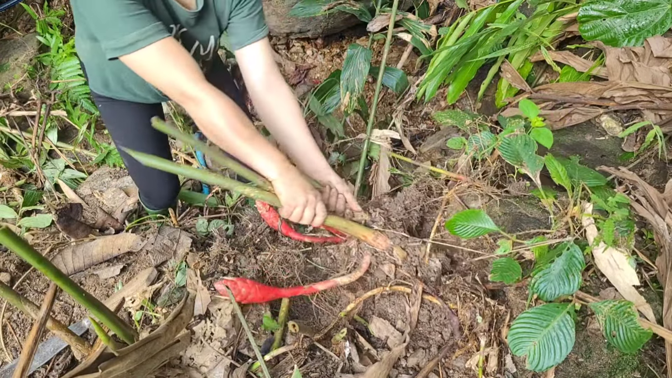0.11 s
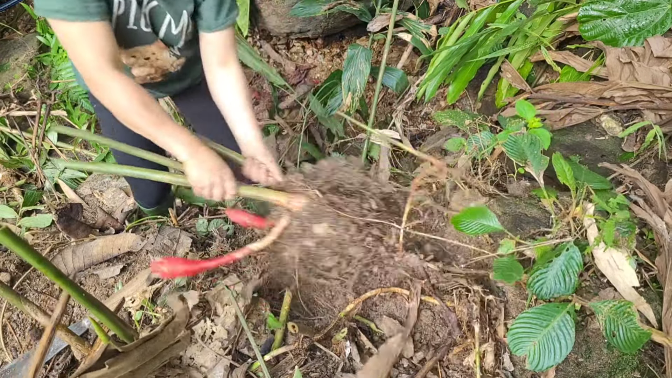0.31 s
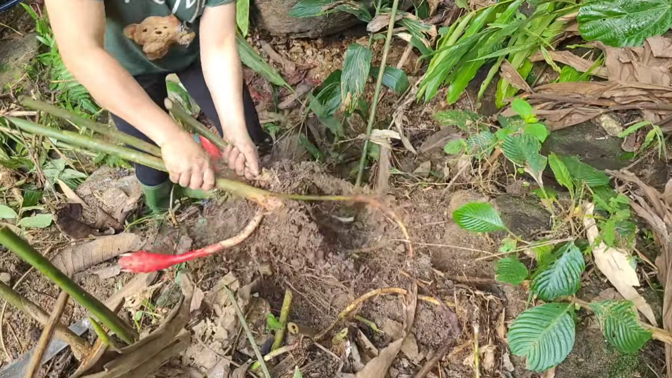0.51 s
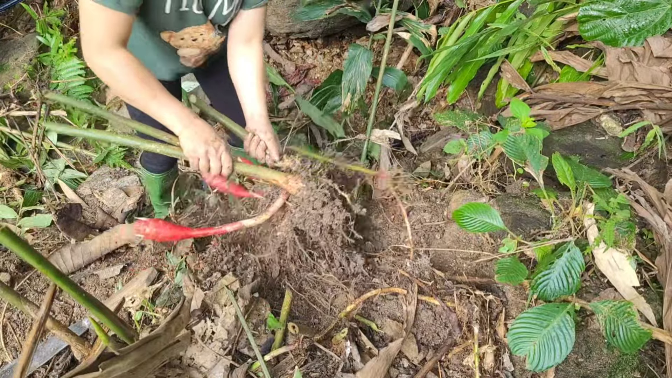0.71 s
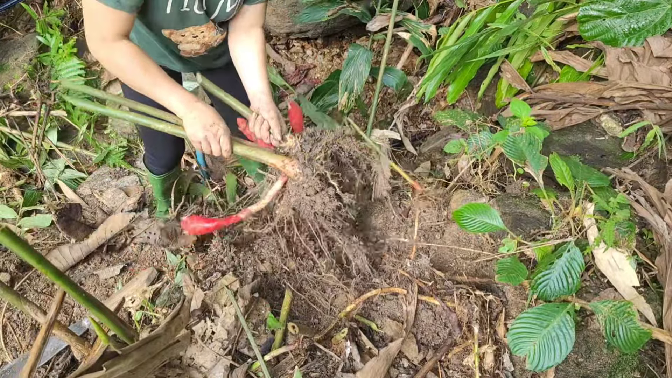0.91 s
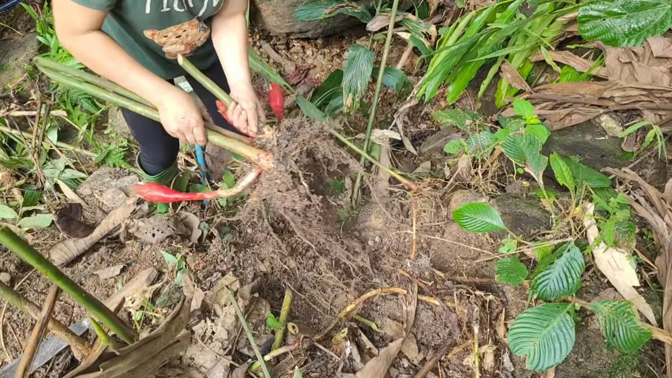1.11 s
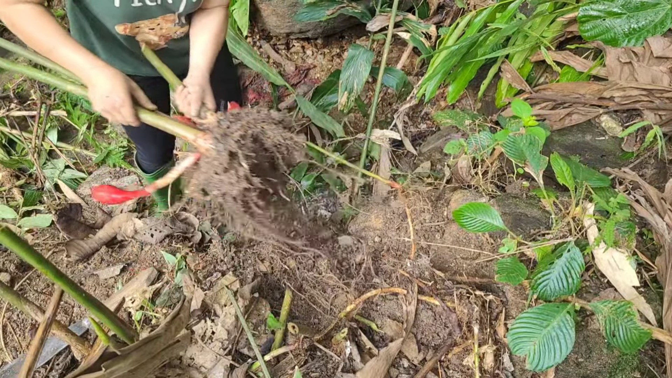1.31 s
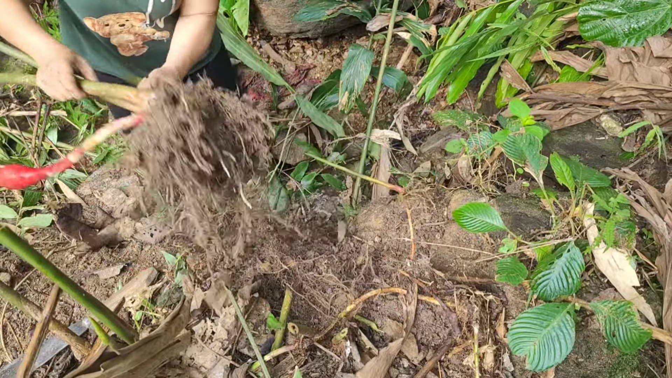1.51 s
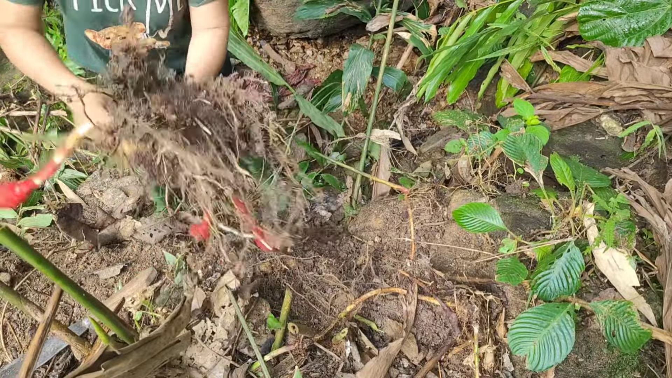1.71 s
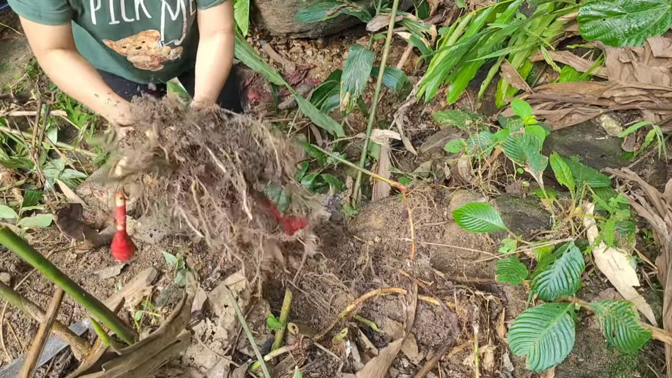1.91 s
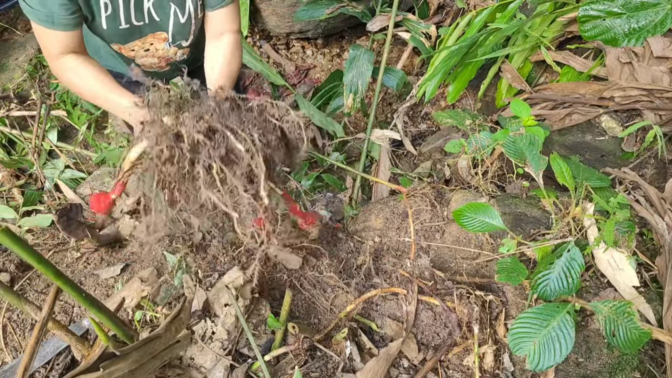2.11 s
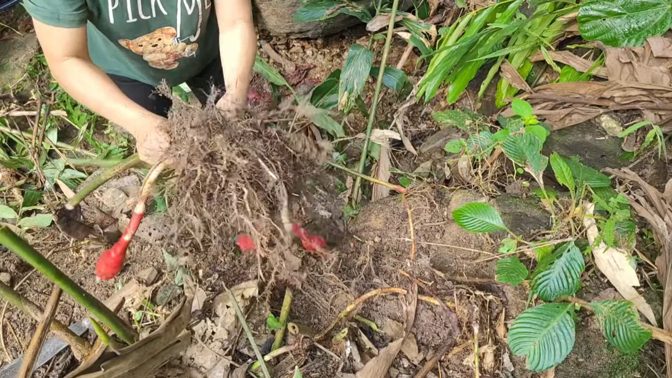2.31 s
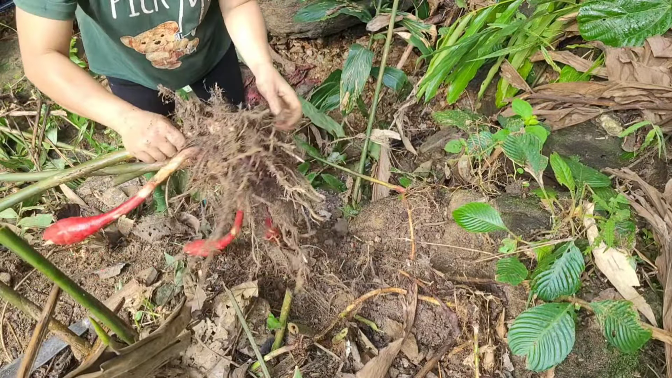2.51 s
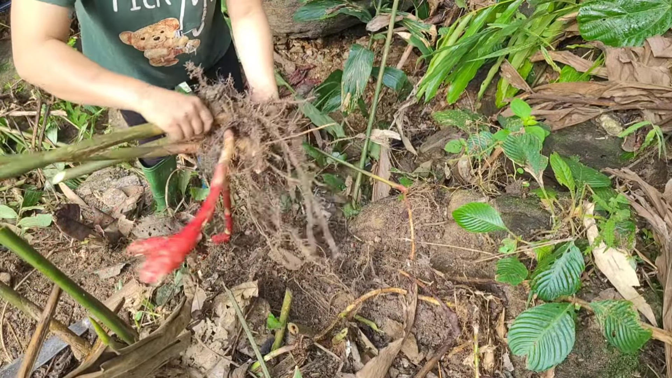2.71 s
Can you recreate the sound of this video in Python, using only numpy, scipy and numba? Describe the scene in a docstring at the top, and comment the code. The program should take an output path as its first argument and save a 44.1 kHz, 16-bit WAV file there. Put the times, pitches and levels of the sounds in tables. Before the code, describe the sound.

A plant clump is torn from forest soil: a tight burst of loud root snaps, then crackling rootlets and pouring grit, fading to light rustles and small clod knocks, heard close outdoors over faint hiss.

```python
"""Uprooting a clump on a forest slope

A clump of plants is pulled out of the ground, a metre or two from a phone. Thick roots snap as damped
modes of wood and fibre; the root ball crunches through dry litter in volleys of tiny rings. Soil, summed
from thousands of small rings, trickles and patters on dead leaves while the clump is lifted and turned.
A hollow tone sinks, clods knock, filtered noise rumbles in the ground and the forest hisses faintly."""
import sys
import numpy as np
from scipy import signal
from scipy.fft import rfft, irfft
from scipy.io import wavfile
from scipy.ndimage import uniform_filter1d
from numba import njit

SR = 44100
rng = np.random.default_rng(int(sys.argv[2]) if len(sys.argv) > 2 else 0)


def dump_mix(stems):
    """Bounce the given channels to the path in sys.argv[1] as a 16-bit WAV at rate SR."""
    frames = np.atleast_2d(stems).T  # one column per channel
    limited = np.clip(frames, -1, 1)  # hard clip at full scale
    pcm = np.round(limited * 32767).astype(np.int16)
    wavfile.write(sys.argv[1], SR, pcm)


N = 127890  # samples, 2.9 s

# stereo arrival: left ahead of right (mean and spread), and spread of the level between the two
LEAD_S, LEAD_SPREAD_S, PAN_SPREAD_DB = .0001, .00011, 3.5
# tiny cracks of splinters, rootlets and leaves
CRACKS_PER_S, CRACK_Q = 4500, 4.05


def undb(db):
    """Decibels to gain."""
    return 10 ** (np.asarray(db) / 20)


def unit(x):
    """Scale to rms 1."""
    return x / np.sqrt(np.mean(x ** 2) + 1e-20)


def curve(table, axis=1):
    """One column of a time table, joined by straight lines."""
    rows = np.array(table)
    return np.interp(np.arange(N) / SR, rows[:, 0], rows[:, axis])


def colour(x, points):
    """Minimum-phase filter whose gain in dB runs straight between the points on a log frequency scale."""
    size = 4096
    hz, db = np.array(points).T
    bins_hz = np.arange(size // 2 + 1) * SR / size
    gain = undb(np.interp(np.log(bins_hz + 1), np.log(hz), db))
    # folding the cepstrum onto positive times makes the filter causal
    cepstrum = irfft(np.log(gain))
    cepstrum[1:size // 2] *= 2
    cepstrum[size // 2 + 1:] = 0
    impulse = irfft(np.exp(rfft(cepstrum)))
    return signal.fftconvolve(x, impulse[None], axes=1)[:, :N]


@njit
def ring(start, hz, t60, size):
    """Sum of damped sines, each started between samples and stopped 60 dB down."""
    out = np.zeros(N)
    for k in range(len(start)):
        first = int(np.ceil(start[k] * SR))
        rate = (2j * np.pi * hz[k] - np.log(1000.) / t60[k]) / SR
        state = size[k] * np.exp(rate * (first - start[k] * SR))
        step = np.exp(rate)
        for i in range(max(first, 0), min(N, first + int(t60[k] * SR) + 2)):
            out[i] += state.imag
            state *= step
    return out


def grains(start, hz, t60, size, lead=0., pan_db=0.):
    """Small rings as they reach the left and right microphone, apart in time and level."""
    hz = np.clip(hz, 20, .45 * SR)
    ears = []
    for side in (1, -1):
        arrival = start - side * lead / 2
        ears.append(ring(arrival, hz, np.abs(t60), size * undb(side * pan_db / 2)))
    return np.array(ears)


def particles(start, hz, q, size, spread_db):
    """Contacts of uneven strength and either sign, scattered over the ground; Q sets how long they ring."""
    count = len(start)
    strength = undb(spread_db * np.minimum(rng.exponential(size=count), 5))
    strength = strength * rng.choice([-1, 1], count)
    lead, pan = rng.standard_normal((count, 2)).T
    t60 = np.log(1000) / np.pi * q / hz
    return grains(start, hz, t60, size * strength, LEAD_S + LEAD_SPREAD_S * lead, PAN_SPREAD_DB * pan)


def shower(per_s, q, spread_db, low_hz, high_hz):
    """A steady fall of particles with an even spectrum; high ones outnumber low ones in each octave."""
    when, pick = rng.random((int(per_s * N / SR), 2)).T
    low, high = np.sqrt(low_hz), np.sqrt(high_hz)
    hz = (low + pick * (high - low)) ** 2
    return particles(when * N / SR, hz, q, hz ** .75, spread_db)


def volley(start, length, db, hz, octaves, per_s, q):
    """A cluster of contacts that sets in fast and thins out; the level is its rms over the length."""
    count = int(per_s * length) + 2
    pitch = hz * 2 ** (octaves * rng.standard_normal(count))
    when = start + length * rng.triangular(0, .2, 1.3, count)
    x = particles(when, pitch, q, np.sqrt(pitch), 2.5)
    return unit(x) * np.sqrt(length * SR / N) * undb(db)


def forest_air():
    """Faint forest hiss: independent noise at the two microphones, filtered to one colour."""
    # spectrum of the air: f/Hz, level/dB
    air_colour = [(30, -19.5), (120, -8), (350, -3.5), (700, -9.5), (2200, 2.5), (5000, 4.5), (6600, 3),
                  (7500, 9.5), (8600, 2), (15000, -12)]
    return unit(colour(rng.standard_normal((2, N)), air_colour)) * undb(-54)


def heave():
    """The ground shudders as the roots let go: low band-passed noise, mostly equal at both microphones."""
    # strength of the shudder: t/s, level/dB
    shudder = [(0, -81), (.2, -88.5), (.26, -53.5), (.29, -55.5), (.33, -57), (.39, -74.5), (.85, -72.5),
               (1.5, -87), (2.3, -80), (2.9, -87)]
    centre_hz, side_db = 58, -8
    band = signal.butter(2, centre_hz * np.array([.75, 1.4]), "band", fs=SR, output="sos")
    mid, side = signal.sosfilt(band, rng.standard_normal((2, N)))
    rumble = unit(mid) + undb(side_db) * unit(side) * np.array([[1], [-1]])
    return rumble * undb(curve(shudder))


def soil():
    """Grit and crumbs pour from the roots onto dry leaves as showers of tiny rings in an uneven stream."""
    # flow of loose soil: t/s, fine grit level/dB, coarser crumbs level/dB
    flow = [(0, -66.5, -69.5), (.12, -57, -59.5), (.24, -51.5, -59.5), (.27, -36, -42), (.3, -47.5, -52.5),
            (.345, -44, -48.5), (.39, -50.5, -56), (.47, -50.5, -56), (.52, -46, -44.5), (.575, -46, -53),
            (.61, -38.5, -44.5), (.69, -39, -42.5), (.75, -42, -46.5), (.8, -33, -38), (.88, -39.5, -42),
            (.93, -38, -44), (.97, -38, -44), (1.06, -44.5, -47.5), (1.35, -46.5, -51.5),
            (1.58, -48, -56.5), (1.7, -47, -53.5), (1.96, -52.5, -54.5), (2.07, -47, -55.5),
            (2.1, -41, -50), (2.19, -46.5, -53.5), (2.3, -43.5, -49), (2.55, -47, -51), (2.68, -48, -55.5),
            (2.75, -47.5, -51.5), (2.9, -49, -57)]
    # grit landing on dry leaves: f/Hz, level/dB
    grit_colour = [(600, -15), (1500, -4), (2600, -1), (3600, -1), (5200, -0.5), (6400, -2.5), (7500, -0.5),
                   (9000, -5), (12000, -1.5), (16000, -4.5)]
    # crumbs landing on dry leaves: f/Hz, level/dB
    crumb_colour = [(30, -31.5), (70, -14), (150, -13), (245, -3.5), (400, -2), (490, -3), (620, 2),
                    (820, 3.5), (950, -1), (1400, 2.5), (2000, 0.5), (3000, -4.5), (6000, -25)]
    flicker_db, flicker_per_s = .7, 50  # spread of the random steps before smoothing, and their rate
    hold = int(SR / flicker_per_s)
    steps = np.repeat(rng.standard_normal(N)[:N // hold + 1], hold)
    flicker = undb(flicker_db * uniform_filter1d(steps, hold)[:N])
    grit = shower(per_s=6000, q=4, spread_db=1.5, low_hz=1230, high_hz=18170)
    grit = unit(colour(grit, grit_colour))
    crumbs = shower(per_s=2200, q=5.16, spread_db=2.9, low_hz=82, high_hz=4050)
    crumbs = unit(colour(crumbs, crumb_colour))
    return flicker * (grit * undb(curve(flow, axis=1)) + crumbs * undb(curve(flow, axis=2)))


def scuffs():
    """Boots and root ball rub softly against the earth: dull volleys of low contacts."""
    # scuffs: t/s, length/s, level/dB, centre f/Hz
    rubs = [(0.068, 0.0624, -61.5, 485), (.485, 0.0589, -52, 421), (1.1, 0.0871, -58.5, 313),
            (1.259, 0.0373, -55, 297), (2.093, 0.0407, -58, 272), (2.235, 0.0656, -56.5, 297),
            (2.55, 0.0793, -57, 281)]
    return sum(volley(*row, octaves=.389, per_s=760, q=4.31) for row in rubs)


def roots():
    """Each root breaks with a tick of fibres, a woody crack, a spray of splinters and a thump in the earth."""
    # snaps: t/s, thump f/Hz, thump level/dB, woody crack level/dB, fibre tick level/dB, fibre pitch [ratio]
    snaps = [(0.1359, 700, -48.5, -38.5, -29, 1), (.193, 500, -48, -33, -31, 1.09),
             (0.2212, 573, -20.5, -16, -26.5, 0.806), (0.2441, 597, -41, -35, -22.5, 1.42),
             (0.2515, 281, -20, -19.5, -21, 1.25), (.2555, 320, -41, -28, -22.5, 1.15),
             (.2588, 603, -20.5, -18, -29, 0.8), (0.2605, 327, -23.5, -20, -15.5, 1.024),
             (.2625, 525, -40.5, -19.5, -20.5, 0.995), (.2662, 436, -31.5, -42.5, -44, 0.92),
             (0.2685, 404, -50, -42.5, -20, 0.984), (.271, 404, -44.5, -32, -25, 0.976),
             (0.3253, 316.4, -30, -11, -12.5, 1.101), (.7628, 600, -42.5, -28.5, -28, 1.8),
             (.775, 700, -57.5, -19, -30.5, 1.25), (.854, 500, -42.5, -25, -23.5, 1.23),
             (1.001, 592, -32, -21, -24.5, 1.08)]
    # modes of the wood, before detuning: f/Hz, level against the crack/dB, t60/s
    wood = [(1402.5, -6.5, .012), (1746, -2, .006), (2500, -4, 0.00267)]
    # modes of the fibres, before pitch ratio and detuning: f/Hz, level against the tick/dB, t60/s
    fibre = [(3060, -10.5, 0.00394), (4933, -0.5, 0.00253), (6820, -4, 0.0027), (11000, -4, .001)]
    thump_t60_s, detune_spread = .0219, .038  # spread as a ratio
    start, thump_hz, thump_db, wood_db, fibre_db, fibre_pitch = np.array(snaps).T
    each = np.ones(len(start))
    out = grains(start, thump_hz, thump_t60_s * each, undb(thump_db))
    for modes, level_db, pitch, sign in ((wood, wood_db, 1, -1), (fibre, fibre_db, fibre_pitch, 1)):
        for k, (hz, db, t60) in enumerate(modes):
            detune = 1 + detune_spread * rng.standard_normal(len(start))
            size = sign * (-1) ** k * undb(level_db + db)  # neighbouring modes start in opposite directions
            out = out + grains(start, hz * pitch * detune, t60 * each, size, lead=.00002)
    for when, crack_db in zip(start, wood_db):
        # splinters last 1.58 ms, 16 dB under the woody crack
        out = out + volley(when, .00158, crack_db - 16, 2890, .785, CRACKS_PER_S, CRACK_Q)
    return out


def crunches():
    """Bunches of rootlets and leaves give way in quick volleys of tiny cracks."""
    # crunches: t/s, length/s, level/dB, centre f/Hz, spread [octaves]
    bunches = [(.259, .018, -40.5, 4530, 0.634), (0.301, 0.00747, -40, 9000, 0.55),
               (0.589, 0.00376, -40, 8000, 0.46), (.604, .02, -39, 8950, 0.58),
               (0.7, 0.013, -35.5, 3240, 0.682), (.735, 0.00737, -42, 1810, 0.385),
               (0.779, 0.0282, -39.5, 1930, 0.67), (0.849, 0.00998, -34, 6180, 0.76),
               (0.906, 0.0082, -34, 2630, 0.576), (0.919, 0.01285, -34, 6620, 0.44),
               (0.992, .022, -36, 2050, 0.72), (1.271, 0.01008, -40.5, 4220, 0.503),
               (1.37, 0.0142, -47, 1610, 0.47), (1.429, 0.01667, -43, 3530, 0.874),
               (1.46, 0.018, -43, 8160, 0.061), (1.526, 0.013, -54, 1370, 0.36),
               (1.617, 0.02114, -50, 1584, 0.38), (1.722, 0.0164, -48, 8900, 0.064),
               (1.804, 0.0268, -47, 2030, 0.89), (2.046, 0.013, -46, 1910, 0.616),
               (2.079, 0.00847, -38.5, 9040, 0.51), (2.094, 0.0255, -46.5, 2005, 1.14),
               (2.31, 0.0187, -41.5, 12100, 0.28), (2.433, 0.02444, -42.5, 1800, 0.69),
               (2.5, 0.0216, -41.5, 4370, 0.913), (2.571, 0.0146, -40.5, 9000, 0.754),
               (2.622, 0.01794, -48.5, 2220, 0.28), (2.808, 0.005, -43, 10000, 0.23)]
    return sum(volley(*row, CRACKS_PER_S, CRACK_Q) for row in bunches)


def hollow():
    """A short soft tone with a weak octave sinks as the clump comes free, perhaps a rubber boot flexing."""
    # sinking tone: t/s, fundamental f/Hz, level/dB
    glide = [(.625, 419.7, -49), (.651, 401.4, -38.5), (.658, 373.4, -22.5), (.666, 271.6, -39.5),
             (.678, 241.2, -32.5), (.698, 231, -35), (.715, 232, -74)]
    octave_db = -14
    phase = 2 * np.pi * np.cumsum(curve(glide, axis=1)) / SR
    t = np.arange(N) / SR
    sounding = (t > glide[0][0]) & (t < glide[-1][0])
    tone = np.sin(phase) + undb(octave_db) * np.sin(2 * phase)
    return sounding * undb(curve(glide, axis=2)) * tone


def clods():
    """Clods and pebbles knock on the litter: a damped ring, with a shorter, higher tick of opposite sign."""
    # landings: t/s, ring's starting level/dB, f/Hz
    landings = [(1.108, -45, 445), (1.264, -38, 478), (1.308, -29, 2400), (1.343, -34, 1600),
                (1.53, -35, 1310), (1.675, -37, 740), (1.884, -28, 1556), (2.175, -38.5, 798),
                (2.36, -27, 630), (2.469, -31.5, 1500), (2.547, -34, 1166), (2.624, -27.5, 2140),
                (2.773, -36.5, 1380)]
    q, tick_db = 5.54, -3
    start, db, hz = np.array(landings).T
    t60 = np.log(1000) / np.pi * q / hz
    knock = grains(start, hz, t60, undb(db), LEAD_S)
    tick = grains(start, hz * 2.81, t60 / 4, -undb(db + tick_db), LEAD_S)
    return knock + tick


def slope(x):
    """Short scattered reflections from ground, trunks and leaves: decaying noise, wide only in the treble."""
    t60_s, echo_db = .1002, -7  # level before the low cut, side part left out
    wide_hz, low_cut_hz = 1860, 444
    t = np.arange(SR // 4) / SR
    decay = undb(-60 * t / t60_s) * (t > .002)  # the first reflection comes after 2 ms
    mid, side = rng.standard_normal((2, len(t))) * decay
    side = signal.sosfilt(signal.butter(1, wide_hz, "high", fs=SR, output="sos"), side)
    echo = np.array([mid + side, mid - side]) / np.sqrt(2 * np.sum(mid ** 2))
    echo = signal.sosfilt(signal.butter(1, low_cut_hz, "high", fs=SR, output="sos"), echo)
    return x + undb(echo_db) * signal.fftconvolve(x, echo, axes=1)[:, :N]


def scene():
    """The pulled clump echoing on the slope, over ground rumble and faint forest air."""
    air = forest_air()
    contacts = roots() + clods() + hollow() + crunches() + scuffs() + soil()
    low_cut = signal.butter(2, 141.2, "high", fs=SR, output="sos")
    contacts = signal.sosfilt(low_cut, contacts)
    return air + heave() + slope(contacts)


def record(dry):
    """The left microphone is brighter in the top treble than the right; the phone cuts above 15.8 kHz."""
    # left microphone against right: f/Hz, level/dB
    balance = [(200, -.5), (5000, -1), (9000, 0), (15000, 2.5)]
    ears = []
    for k, side in enumerate((1, -1)):
        half = [(hz, side * db / 2) for hz, db in balance]
        ears.append(colour(dry[k:k + 1], half))
    top_cut = signal.ellip(10, .1, 80, 15800, fs=SR, output="sos")
    return signal.sosfilt(top_cut, np.vstack(ears))


dry = scene()
out = record(dry)
dump_mix(out)
```